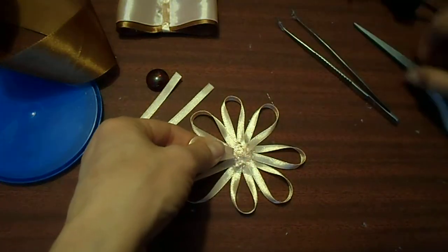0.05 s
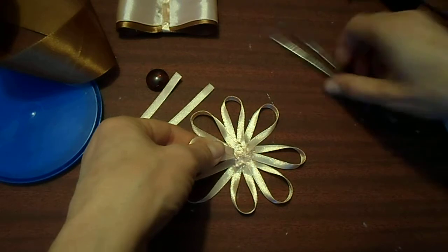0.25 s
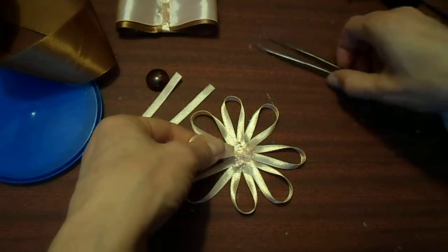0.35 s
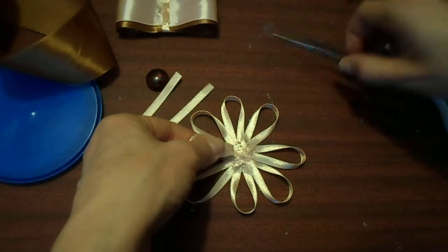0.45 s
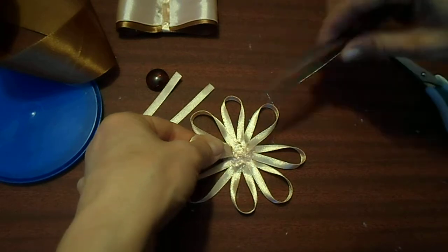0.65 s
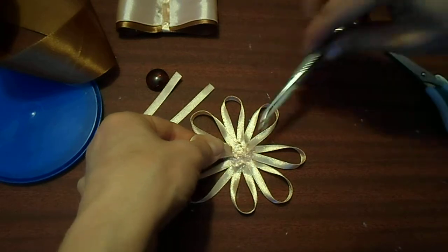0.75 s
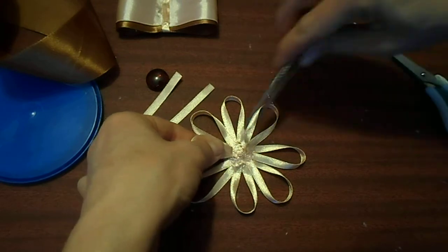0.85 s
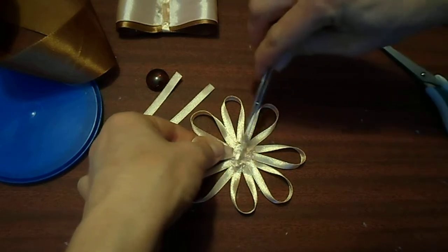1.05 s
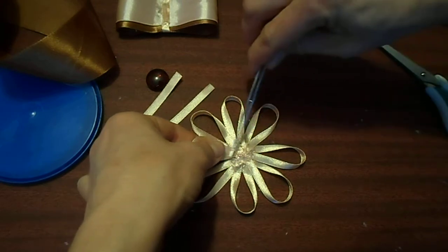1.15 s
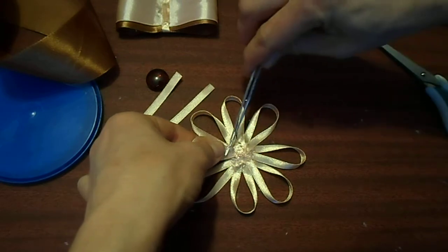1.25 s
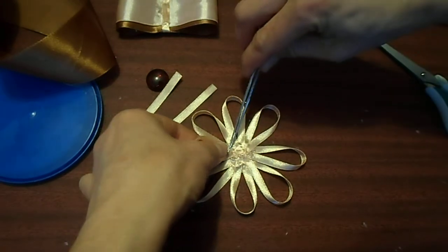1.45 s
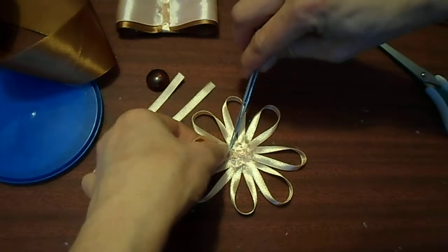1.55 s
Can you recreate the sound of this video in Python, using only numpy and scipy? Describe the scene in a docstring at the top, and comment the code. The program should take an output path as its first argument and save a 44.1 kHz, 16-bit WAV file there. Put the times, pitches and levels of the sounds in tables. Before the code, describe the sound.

Scissors are set down on a wooden table: a soft bump at 0.1 seconds, a blade tick at 0.2, then the loudest sound, a knock with a quick rattle, around 0.3. Steel tweezers scrape briefly over the wood at about 0.5 and click lightly in the fingers at 0.6. Until the end, around 1.6 seconds, there is only low room rumble with a faint pulsing electronic hum and whine.

```python
"""In a small quiet room, scissors are laid on a wooden table: a soft touch, a tick of the blades,
then a drop and a rattle that make the wood ring. Steel tweezers are dragged off the table, scraping
in tiny slips over the grain, and click in the fingers. Under it all lie room rumble and the faint
pulsing hum and whine of a camera's electronics."""
import sys
import numpy as np
from scipy import signal
from scipy.fft import rfft, irfft, next_fast_len
from scipy.io import wavfile
from scipy.ndimage import uniform_filter1d, map_coordinates

SR = 44100
rng = np.random.default_rng(int(sys.argv[2]) if len(sys.argv) > 2 else 0)


def master(y):
    """Save y as 16-bit WAV."""
    cut = np.clip(np.atleast_2d(y).T, -1, 1)
    pcm = np.round(cut * 32767)  # scale
    wavfile.write(sys.argv[1], SR, pcm.astype(np.int16))


N = 70560

# Levels in the tables are relative. A fade time (t60) is how long a sound takes to fall by 60 dB.
# The blades tick. Each row: start in seconds, level in dB.
BLADE_TICKS = [(0.2008, -27), (0.2155, -53)]
# The scissors land and rattle. Each row: start in seconds, wood knock in dB, steel click in dB.
BOUNCES = [(0.2685, -16.5, -26), (.2828, -36, -44), (.2906, -35, -36.5), (.2922, -25.5, -48),
           (0.3069, -36, -48), (0.3178, -41, -45), (.3305, -44, -57)]
# Soft touches on the table. Each row: start in seconds, level in dB.
SOFT_TOUCHES = [(0.1214, -45.5), (0.4673, -48), (0.657, -64.5), (0.6703, -64), (1.04, -65.5)]
# The tweezers catch on the wood. Each row: start in seconds, scratch in dB, knock in dB.
SNAGS = [(0.521, -34, -41.5), (.5288, -43.5, -38)]
# The tweezers click in the fingers. Each row: start in seconds, level in dB.
FINGER_PINCHES = [(0.6074, -38.5), (0.6236, -54.5)]
# How hard the sliding tweezers press. Each row: time in seconds, level in dB.
SLIDE_PRESSURE = [(0.465, -71), (0.476, -41), (.486, -41), (0.494, -35), (.503, -44.5), (0.516, -41),
                  (.531, -38), (.54, -46.5), (.55, -62)]
# Tweezers and table ring together. Each row: pitch in Hz, width in Hz, level in dB.
SLIDE_RESONANCES = [(446, 22, -9.5), (548, 37, -14.5), (791, 24, 1), (928, 83, -7), (1160, 89, -9.5),
                    (1700, 130, -14), (2143, 60, -18), (2338, 71, -15.5), (3320, 52, -22), (3570, 80, -37)]

# The notes each object rings with. Each row: pitch in Hz, level in dB, fade time in seconds.
TABLE_NOTES = [(130.3, -17.5, 0.22), (263.5, -21.5, .2), (445, -1, 0.17), (516, -7, 0.15),
               (551, -11.5, 0.12), (666, -10.5, .12), (716, -7.5, 0.16), (792, -12, 0.18),
               (868, -8.5, 0.16), (969, -8, .14), (1322, -13, 0.14), (1550, 1.5, .13), (1699, -6, 0.13),
               (1888, -2, 0.089), (2298, -12, .13), (2290, -19, .15), (3300, -9.5, 0.11)]
BLADE_NOTES = [(865, 0, 0.19), (1165, 4, 0.055), (1528, 5, 0.029), (2359, 4.5, 0.093), (2760, -6, 0.078),
               (3310, 3, 0.067), (3560, -10, .05), (6089, -18, 0.064), (8000, -27, 0.054)]
TWEEZER_NOTES = [(1577, 5, 0.076), (2510, -13, .08), (3400, 2, 0.04), (4300, 7, .06), (4500, -26, .05),
                 (5100, -21, .06)]

# The tone of each sound, from bass to treble. Each row: frequency in Hz, level in dB.
BLADE_TICK_TONE = [(60, -8), (150, -5), (300, -6.5), (500, -10.5), (860, 4), (1200, -4.5), (1550, 1.5),
                   (1800, -10), (2350, 5), (2900, -15.5), (3400, 3), (4400, -13), (6200, -6), (7900, -10),
                   (8800, -16), (10000, -9), (12000, -37)]
WOOD_KNOCK_TONE = [(50, -8), (150, -9.5), (280, -15.5), (430, -8.5), (750, -1.5), (1250, -11), (1600, -3.5),
                   (1950, -2.5), (2450, -6), (2900, -27.5), (3350, -14.5), (4400, -19), (10000, -45.5)]
STEEL_CLICK_TONE = [(500, -12), (3000, 5), (4000, -2.5), (4700, -4), (6700, 2), (8000, -2), (8800, -8.5),
                    (10000, 2), (11000, -14), (12000, -23)]
TOUCH_TONE = [(60, -14), (150, -4.5), (260, 1), (430, -2.5), (700, -8.5), (1150, -9.5), (1800, -22.5),
              (4000, -39), (12000, -43)]
SCRATCH_TONE = [(150, -10.5), (450, -4), (1200, 1), (1900, -4), (2400, -6.5), (3300, -0.5), (4200, -11),
                (5500, -14.5), (7500, -32), (10000, -29), (12000, -42)]
LIFT_KNOCK_TONE = [(100, -15), (250, -9.5), (500, 1), (800, -5), (1150, 0), (1700, -11), (2500, -12),
                   (4000, -35), (12000, -54)]
PINCH_TONE = [(300, -14), (800, -0.5), (1500, 4.5), (2000, -12), (2700, 4), (3300, -1), (4200, 2),
              (5200, -4.5), (6100, -13.5), (7300, -6), (8600, -10), (9600, -18), (12000, -42)]
GRIT_TONE = [(100, -11), (300, -5), (1000, 4.5), (2400, -7.5), (4500, -14), (7000, -16), (8800, -18.5),
             (10300, -12.5), (12000, -44)]
TIP_HISS_TONE = [(2000, -22), (5000, -7), (6800, -3), (8700, -4), (10200, 3), (11000, -11), (12000, -13)]
ECHO_TONE = [(100, 4.5), (500, 3), (2500, -3.5), (5000, -4.5), (11000, -1.5)]
RASP_TONE = [(300, -4), (1100, 1.5), (1700, -5.5), (3600, -6.5), (4400, 1.5), (4900, 1), (6000, -11),
             (8500, -10.5), (10300, 0), (11000, -13), (12000, -15)]
RUMBLE_TONE = [(20, 7), (45, -4.5), (100, -5), (200, -6.5), (400, -16.5), (800, -22), (1600, -28),
               (4000, -31.5), (8000, -34.5), (10500, -31.5), (12000, -58.5)]

# How long the room echoes. Each row: frequency in Hz, fade time in seconds.
ECHO_FADES = [(150, 0.2), (1000, 0.2), (3000, 0.21), (6000, 0.15), (11000, 0.13)]
# The notes of the hum. Each row: multiple of the camera's frame rate, level in dB.
HUM_NOTES = [(1, -46), (2, -58), (3, -60.5), (4, -59)]
# The notes of the whine. Each row: multiple of its lowest pitch, level in dB.
WHINE_NOTES = [(1, -0.5), (2, -6), (3, -8), (4, 2), (5, -11.5), (9, -6)]
# Longer gaps in the whine also swell the hum. Each row: time in seconds, gap as a share of a frame.
WHINE_GAPS = [(0, 0.23), (.12, 0.17), (.39, 0.14), (.46, .35), (.57, 0.18), (.7, 0.47), (.82, .15),
              (.9, 0.42), (1.01, 0.12), (1.1, 0.43), (1.21, 0.19), (1.3, 0.49), (1.41, .15), (1.6, .22)]
# The whine gives way to a higher whistle. Each entry: start in seconds.
WHISTLE_STARTS = [-.025, .08, .745, .936, 1.138, 1.336, 1.439, 1.54]

RING_S = 0.4  # seconds set aside for each hit to die away


def scissors():
    """The blades tick, then the scissors drop on the table top and rattle to rest."""
    out = np.zeros(N)
    for start, db in BLADE_TICKS:
        tick = contact(BLADE_TICK_TONE, t60=0.008, push=0.41)
        add(out, start, amp(db - 8) * (tick + amp(-10.5) * ring(BLADE_NOTES)))
    for start, knock_db, click_db in BOUNCES:
        knock = contact(WOOD_KNOCK_TONE, t60=0.043, push=0.64)
        add(out, start, amp(knock_db - 7) * (knock + amp(-7.5) * ring(TABLE_NOTES)))
        add(out, start, amp(click_db - 6) * contact(STEEL_CLICK_TONE, t60=0.0075, push=0.12))
    return out


def touches():
    """Hand and handles bump dully on the wood."""
    out = np.zeros(N)
    for start, db in SOFT_TOUCHES:
        bump = contact(TOUCH_TONE, t60=0.014, push=1.5)
        tail = amp(0.5) * contact(TOUCH_TONE, t60=0.12, push=0)
        add(out, start, amp(db) * (bump + tail))
    return out


def tweezers():
    """The tweezers slide, catch on the wood as they lift, and click in the fingers."""
    out = slide()
    for start, scratch_db, knock_db in SNAGS:
        add(out, start, amp(scratch_db - 5.5) * contact(SCRATCH_TONE, t60=0.032, push=0.17))
        add(out, start, amp(knock_db - 1.5) * contact(LIFT_KNOCK_TONE, t60=0.029, push=0.36))
    for start, db in FINGER_PINCHES:
        click = contact(PINCH_TONE, t60=0.014, push=0.081)
        add(out, start, amp(db - 5) * (click + amp(-10.5) * ring(TWEEZER_NOTES)))
    return out


def slide(fastest_s=0.503, hiss_width_s=0.012):
    """Tiny slips make tweezers and table ring; the tips hiss where the slide is fastest."""
    t = np.arange(N) / SR
    pressure = amp(np.interp(t, *np.transpose(SLIDE_PRESSURE), left=-120, right=-120))
    ringing = unit(resonant(slips(), SLIDE_RESONANCES))
    grit = amp(-11.5) * unit(coloured(slips(), GRIT_TONE))
    swell = np.exp(-((t - fastest_s) / hiss_width_s) ** 2)
    hiss = amp(-58.5) * swell * unit(coloured(slips(), TIP_HISS_TONE))
    return pressure * (ringing + grit) + hiss


def slips(per_second=7000):
    """Steel slips over the wood grain in tiny jerks of random timing and strength."""
    return unit((rng.random(N) < per_second / SR) * rng.standard_normal(N))


def contact(tone, t60, push, hold_s=0.00336):
    """One hit: a sharp push, and a chatter that holds for a moment before it dies away."""
    t = np.arange(int(RING_S * SR)) / SR
    fade = amp(-60 * np.maximum(t - hold_s, 0) / t60)
    chatter = rng.standard_normal(len(t)) * fade
    for _ in range(3):  # even out the frequencies, then restore the fade
        spectrum = rfft(chatter)
        chatter = irfft(spectrum / np.abs(spectrum), len(t)) * np.sqrt(fade)
    chatter[0] += push
    hit = coloured(chatter, tone)
    return hit / np.linalg.norm(hit) * np.sqrt(0.005 * SR)  # as much energy as 5 ms at level 1


def ring(notes):
    """A struck object rings with fading notes, a little differently each time."""
    t = np.arange(int(RING_S * SR)) / SR
    return sum(amp(db + rng.normal() - 60 * t / t60) * (-1) ** k * np.sin(2 * np.pi * hz * t)
               for k, (hz, db, t60) in enumerate(notes))


def room_echo(x, build_s=0.009):
    """The echo from the walls builds up briefly and dies faster in the treble."""
    hz, t, noise = signal.stft(rng.standard_normal(SR // 2), SR, nperseg=256)
    fade = amp(-60 * t / along(ECHO_FADES, hz)[:, None])
    build = 1 - np.exp(-t / build_s)
    tail = signal.istft(noise * fade * build, SR, nperseg=256)[1]
    return coloured(signal.fftconvolve(x, tail / np.linalg.norm(tail))[:N], ECHO_TONE)


def room_rumble():
    """The quiet room has a steady noise of its own, mostly deep bass."""
    return amp(-61) * unit(filtered(rng.standard_normal(N), lambda hz: amp(along(RUMBLE_TONE, hz))))


def electronics(frame_hz=30, whistle_s=0.043):
    """The camera hums; its whine breaks off once a frame and at times jumps to a whistle."""
    t = np.arange(N) / SR
    frames = frame_hz * t - 0.851  # a gap falls on each whole number
    gap = np.interp(t, *np.transpose(WHINE_GAPS))
    outside_gap = np.abs(frames - np.round(frames)) > gap / 2
    whistling = np.any([(t > start) & (t < start + whistle_s) for start in WHISTLE_STARTS], axis=0)
    whine_on = uniform_filter1d(outside_gap * (1.0 - whistling), size=130)  # 3 ms soft edges
    whistle_on = uniform_filter1d(whistling.astype(float), size=130)
    return gap * hum(frames) + amp(-69) * whine_on * whine() + amp(-72) * whistle_on * whistle(t)


def hum(frames, waver_db=2):
    """Low notes waver at the frame rate and its multiples."""
    out = np.zeros(N)
    for k, db in HUM_NOTES:
        level = amp(db + waver_db * wobble(6))
        out += level * np.sin(2 * np.pi * (k * frames + rng.random()) + 0.5 * wobble(10))
    return out


def whine(pitch_hz=1140.4, jitter=0.01414):
    """A thin note with a shaky pitch, mixed with raspy noise."""
    phase = 2 * np.pi * np.cumsum(pitch_hz * (1 + jitter * wobble(900))) / SR
    notes = unit(sum(amp(db) * np.sin(k * phase + wobble(200)) for k, db in WHINE_NOTES))
    rasp = amp(-3) * unit(coloured(rng.standard_normal(N), RASP_TONE))
    return notes + rasp


def whistle(t, pitch_hz=9280, flutter_hz=178):
    """A very high note that flutters fast."""
    flutter = 1.6 * np.sin(2 * np.pi * flutter_hz * t) + 0.91 * wobble(1100)
    return unit(np.sin(2 * np.pi * pitch_hz * t + flutter))


def amp(db):
    """Turn decibels into a number to multiply by."""
    return 10 ** (np.asarray(db) / 20)


def unit(x):
    """Scale a sound to an average (rms) level of 1."""
    return x / np.sqrt(np.mean(x ** 2) + 1e-20)


def along(points, hz):
    """Read between the rows of a frequency table, giving each octave about equal room."""
    frequencies, values = np.transpose(points)
    return np.interp(np.log(hz + 1), np.log(frequencies + 1), values)


def filtered(x, response):
    """Multiply each frequency in a sound by response(hz)."""
    size = next_fast_len(len(x) + SR // 2)
    return irfft(rfft(x, size) * response(np.fft.rfftfreq(size, 1 / SR)), size)[:len(x)]


def coloured(x, tone, size=4096):
    """Shape a sound's bass and treble with a tone table."""
    cepstrum = irfft(np.log(amp(along(tone, np.fft.rfftfreq(size, 1 / SR)))))
    # Fold the filter forward in time, so nothing sounds before the hit.
    cepstrum[1:size // 2] *= 2
    cepstrum[size // 2 + 1:] = 0
    return signal.fftconvolve(x, irfft(np.exp(rfft(cepstrum))))[:len(x)]


def resonant(x, peaks):
    """Make a sound ring at the given pitches."""
    return filtered(x, lambda hz: sum(
        (-1) ** k * amp(db) * 1j * hz * width / (pitch ** 2 - hz ** 2 + 1j * hz * width)
        for k, (pitch, width, db) in enumerate(peaks)))


def add(track, start, sound):
    """Mix a sound into the track at a start time in seconds."""
    i = max(round(start * SR), 0)
    track[i:i + len(sound)] += sound[:N - i]


def wobble(rate):
    """A smooth curve through `rate` random values a second."""
    return map_coordinates(rng.standard_normal(int(N * rate / SR) + 4), [np.arange(N) * rate / SR])


def scene():
    """Mix the tools on the table with their echo and the background."""
    tools = scissors() + touches() + tweezers()
    return (tools + room_echo(amp(-9.5) * tools) + room_rumble() + electronics())[None]


def record(dry, top_hz=12300):
    """The camera keeps none of the highest treble."""
    return filtered(dry[0], lambda hz: hz < top_hz)[None]


dry = scene()
out = record(dry)
master(out)
```